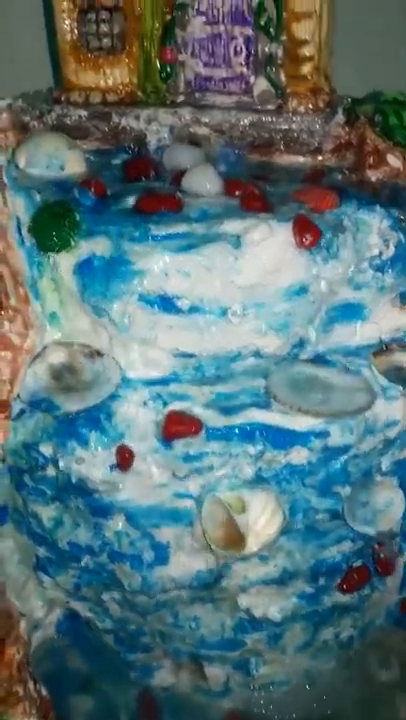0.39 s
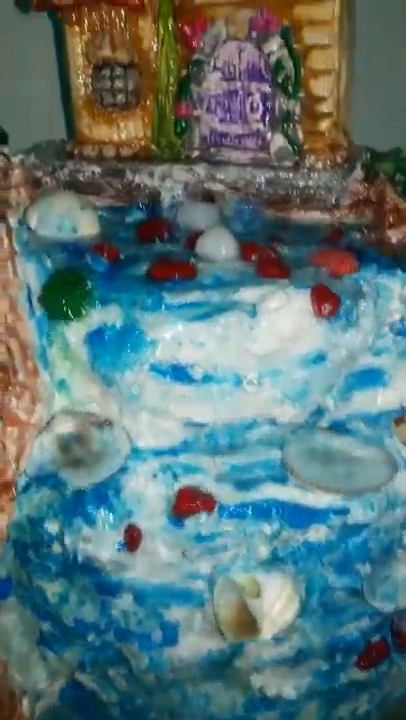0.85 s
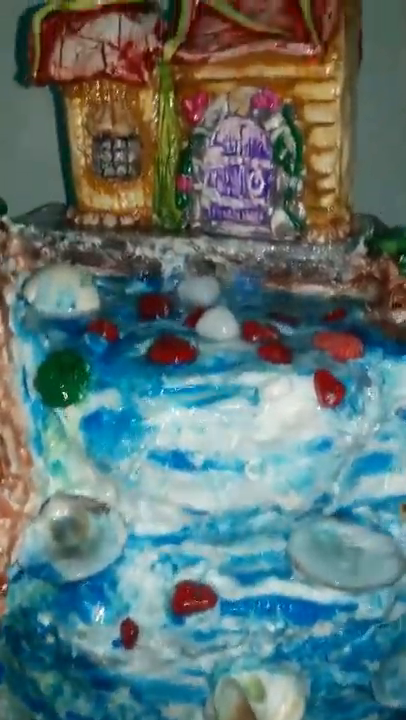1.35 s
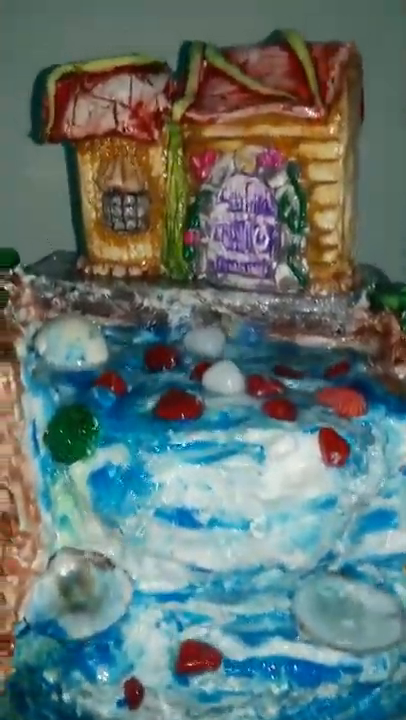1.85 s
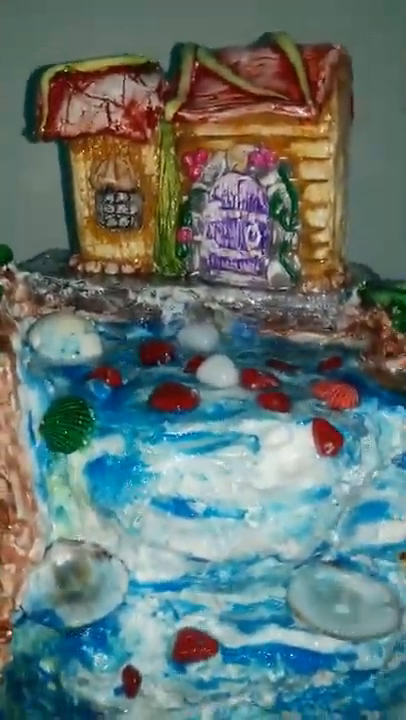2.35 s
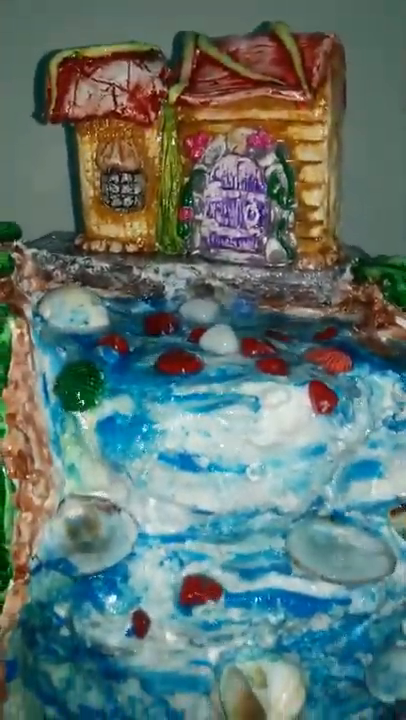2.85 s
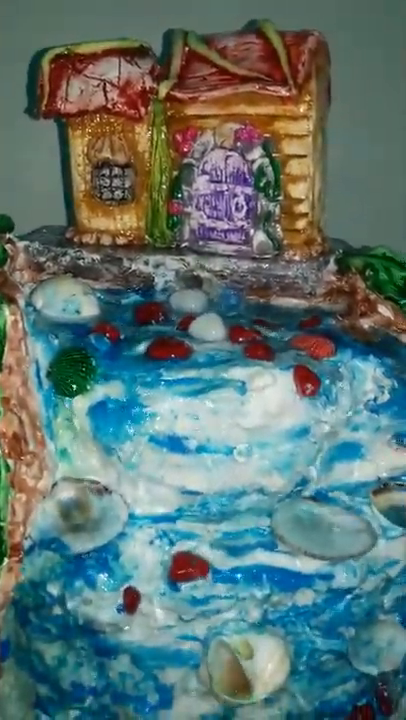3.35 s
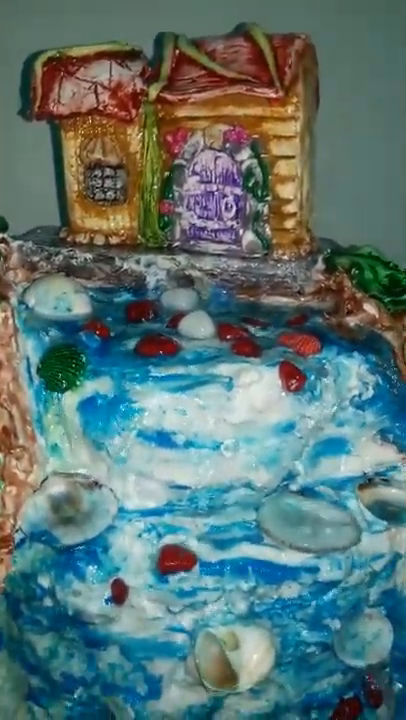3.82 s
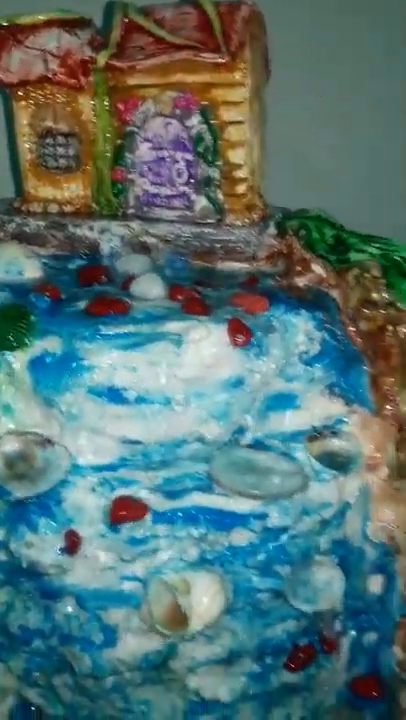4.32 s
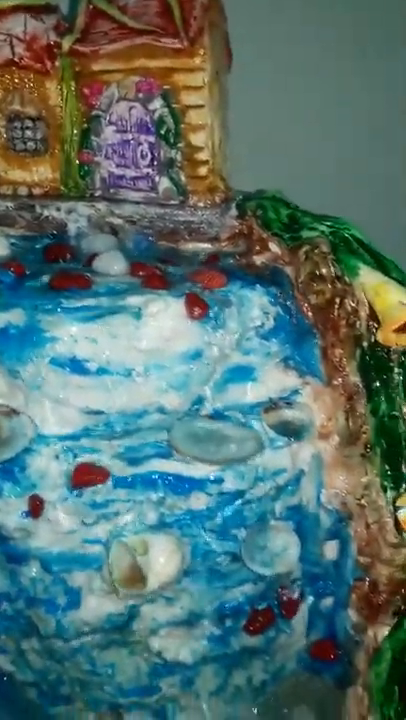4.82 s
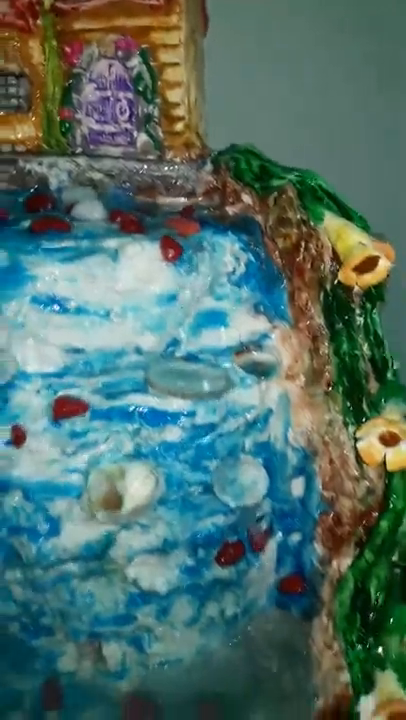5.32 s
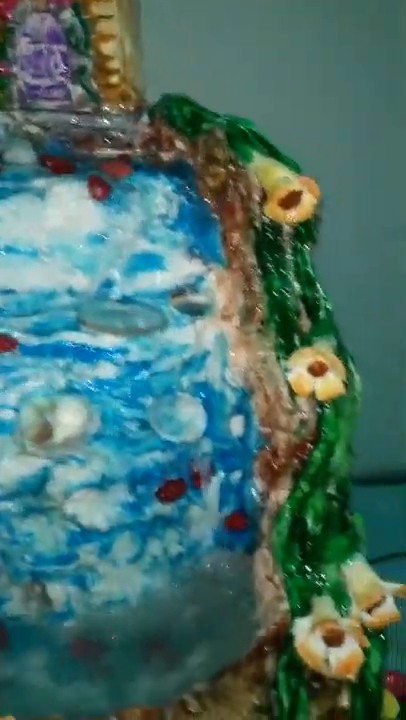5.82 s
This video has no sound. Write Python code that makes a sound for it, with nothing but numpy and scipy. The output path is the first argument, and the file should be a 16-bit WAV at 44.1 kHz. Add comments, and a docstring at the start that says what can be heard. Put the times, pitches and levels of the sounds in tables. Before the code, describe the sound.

Close microphone on trickling water in a small room. Tiny bubbles ring briefly with gliding pitches, sharp treble ticks mark splashes, and a faint patter runs throughout over a low, steady hum. Strong round plops fall mid-way, single clear drips follow near 3.8 and 4.8 seconds, and a gurgling flurry closes it.

```python
"""Small indoor fountain

Water drips and trickles into a basin close to a microphone, almost mono.
Trapped air bubbles ring as damped sines, glide in pitch and are cut off; splashes tick as treble noise snaps.
Finer droplets patter and spray at random; decaying noise tails form the small room's answer.
Shaped noise and faint tones give the pump's low hum, the far trickle and a thin whine that dies out."""
import sys
import numpy as np
from scipy import signal
from scipy.fft import rfft, irfft, next_fast_len
from scipy.io import wavfile
from scipy.ndimage import map_coordinates

SR = 44100
rng = np.random.default_rng(int(sys.argv[2]) if len(sys.argv) > 2 else 0)


def generate_wav(sig):
    """Save sig (samples, or channels by samples) to the path in sys.argv[1] as 16-bit PCM at SR."""
    pcm = np.round(np.clip(np.atleast_2d(sig).T, -1, 1) * 32767).astype(np.int16)
    wavfile.write(sys.argv[1], SR, pcm)


def gain_from_db(level_db):
    """Convert decibel levels to linear amplitude factors (20 dB per decade)."""
    decades = np.asarray(level_db, float) / 20
    return 10 ** decades


N = 261954  # samples


def unit(x):
    """Scale to rms 1."""
    return x / np.sqrt(np.mean(x ** 2) + 1e-20)


def along(points, hz):
    """Interpolate (Hz, value) points on a log-frequency axis."""
    point_hz, value = np.transpose(points)
    return np.interp(np.log(hz + 1), np.log(point_hz + 1), value)


def above(hz, edge_hz, steepness):
    """Gain of a smooth high-pass, one half at its edge."""
    return 1 / (1 + (edge_hz / (hz + 1)) ** steepness)


def filtered(x, response):
    """Multiply the spectrum of x by a response of frequency."""
    size = next_fast_len(N + 8192)
    spectrum = rfft(x, size) * response(np.fft.rfftfreq(size, 1 / SR))
    return irfft(spectrum, size)[..., :N]


def wobble(rate_hz):
    """Smooth random curve with rate_hz knots a second."""
    knots = rng.standard_normal(int(N * rate_hz / SR) + 4)
    return map_coordinates(knots, [np.arange(N) * rate_hz / SR])


def placed(start_s, grains):
    """Sum one grain per row at its start time."""
    at = np.round(start_s * SR).astype(int)[:, None] + np.arange(grains.shape[1])
    return np.bincount(at.ravel(), grains.ravel(), N + SR)[:N]


def ringing(start_s, level_db, pitch_hz, rise, t60_ms, life_ms, size):
    """Bubbles as damped sines whose pitch glides with age squared, choked off when they burst."""
    swell_cycles, burst_cycles = 0.32, 1.8
    t = np.arange(size) / SR
    level_db, hz, rise = level_db[:, None], pitch_hz[:, None], rise[:, None]
    t60, life = t60_ms[:, None] / 1000, life_ms[:, None] / 1000
    age = np.minimum(t / life, 1.3)
    cycles = hz * (t + rise * life * age ** 3 / 3)  # integral of hz * (1 + rise * age ** 2)
    swell = 1 - np.exp(-t * hz / swell_cycles)
    burst = np.clip((life - t) * hz / burst_cycles + .5, 0, 1)
    decay = gain_from_db(level_db - 60 * t / t60)
    return placed(start_s, decay * burst * swell * np.sin(2 * np.pi * cycles))


def drips():
    """Bubbles lose 60 dB in a set number of cycles unless they burst first; plinks are damped more heavily."""
    # bubbles that ring until they burst: start_s, level_db, pitch_hz, rise (share of pitch over life), life_ms
    bubbles = [(.028, -46.5, 3100, 0.41, 5.7), (.2831, -38, 3830, 0.28, 1.2),
               (0.6115, -34, 7800, -0.085, 1.5), (0.646, -33, 1070, -0.059, 5.8),
               (0.8761, -36, 7720, -0.063, 4), (.888, -36.5, 660, 0.15, 8.2),
               (0.638, -35, 1314, 0.78, 14.4), (1.136, -12.5, 3260, 0.1, 5.9), (1.682, -37, 3000, 0, 0.6),
               (2.039, -46, 4380, 0.09, 3.5), (2.1, -47, 2500, 0, 0.89), (1.157, -30, 5860, -0.067, 0.55),
               (1.1644, -16.5, 3130, -0.8, 1.05), (1.1657, -19, 2300, 0.015, 1.6),
               (1.411, -36.5, 5760, .07, 0.53), (1.5542, -22, 980, -0.63, 2.8), (1.555, -19, 608, 0.19, 29),
               (1.6397, -34.5, 6400, .14, 0.56), (1.697, -21, 3340, 0.012, 4.4),
               (1.7215, -11.5, 3076, -0.22, 3.65), (1.7494, -33.5, 2016, -0.086, 2.7),
               (1.758, -20.5, 1204, -0.16, 3.3), (1.76, -33.5, 1050, 0.22, 10),
               (1.8576, -33.5, 2970, 0.0019, 3.2), (2.0184, -16, 900, -0.55, 2.6),
               (2.0193, -19, 513, -0.12, 18.6), (2.0394, -28.5, 496, 0.34, 105),
               (2.165, -34, 897, 0.12, 5.7), (2.1652, -28, 2780, 0.72, 6.8),
               (2.4002, -33.5, 7480, 0.44, 2.7), (2.4619, -30, 3260, -0.12, 1.7),
               (2.5065, -26.5, 3370, -0.14, 0.8), (2.5066, -9.5, 762, 0.56, 8.3),
               (2.5297, -27.5, 2150, 0.16, 4.1), (2.5359, -27, 708, 0.72, 34), (2.5204, -43, 2500, .3, 3.4),
               (2.5366, -29, 4273, -.2, 0.88), (2.617, -39.5, 7197, 0.031, 0.91),
               (2.6849, -29.5, 2050, -0.037, 2.9), (2.7158, -28.5, 2940, -.23, 0.66),
               (2.744, -20, 1092, 0.14, 12), (2.752, -41, 1400, 0.62, 13), (2.7693, -27, 1920, -.15, 2),
               (2.7694, -24, 3390, 0.076, 1.4), (2.768, -37, 923, 0.55, 25), (2.7768, -31, 6564, 0.12, .71),
               (2.7834, -34, 6613, .06, 0.55), (2.899, -35, 860, -.21, 10), (3.044, -35, 6480, 0.1, 3.2),
               (3.131, -34, 6070, 0.42, 2), (3.2478, -30, 3610, -0.36, 1.3),
               (3.3046, -19.5, 982, -0.21, 5.4), (3.3086, -31, 883, -0.18, 10),
               (3.351, -36, 6518, 0.12, 0.63), (3.3506, -35, 3960, 0.13, 4.9), (3.3569, -25, 3530, 0, 1.6),
               (3.3783, -37, 1054, 0.038, 8), (3.4442, -25, 2850, .2, 5.3), (3.449, -34, 3980, 0.11, 3),
               (3.537, -46, 4270, 0, 7.4), (3.551, -45, 3500, 0, 5), (3.329, -50, 4280, 0, 4),
               (3.458, -37, 5750, 0.43, .87), (3.5994, -30.5, 6670, 0.43, 1.2),
               (3.7218, -35, 6640, 0.053, .43), (3.7557, -13.5, 3000, -0.11, 0.72),
               (3.8724, -33, 7100, 0.32, .67), (3.8819, -35, 3920, .16, 1.1),
               (4.074, -34.5, 990, -0.31, 5.8), (4.0968, -29.5, 1970, -0.11, 0.63),
               (4.1321, -37.5, 4260, -0.076, 1.3), (4.248, -27.5, 4740, 0.22, 0.36),
               (4.4529, -34.5, 796, -0.27, 15), (4.5782, -33.5, 3300, .19, 3),
               (4.8254, -36, 1560, -0.021, 45), (5.3625, -40, 1300, 0.1, 14), (5.652, -46.5, 3120, -.08, 8),
               (5.766, -38, 850, .1, 8.9), (5.0684, -34, 5700, .18, 3), (5.3191, -35.5, 5400, 0.5, 4.1),
               (5.3387, -17.5, 858, -0.12, 7.1), (5.3438, -36, 7100, 0.069, 2),
               (5.3542, -32.5, 3470, -0.086, 7.2), (5.3583, -21, 735, 0.42, 26),
               (5.3865, -31, 1244, 0.76, 5.8), (5.3904, -29, 5620, -0.027, 1.2),
               (5.3903, -21.5, 1283, 0.27, 7.25), (5.3978, -32.5, 1860, -0.089, 7.2),
               (5.4084, -23, 1199, -0.34, 2.1), (5.578, -35, 6900, -.04, 1.1),
               (5.5834, -26.5, 800, .2, 9.4), (5.588, -45, 3800, 0.15, 2.7), (5.596, -30, 1285, 0.098, 10),
               (5.609, -29, 686, 0.39, 22), (5.6234, -29, 590, -.12, 18), (5.6652, -23.5, 712, .74, 9.5),
               (5.7488, -31.5, 1940, 0.12, 7.4), (5.749, -30, 1430, -.01, 5.4),
               (5.831, -18.5, 885, -0.055, 12), (5.831, -20.5, 1680, 0.27, 6.6),
               (5.853, -28.5, 555, 0.43, 47), (5.878, -23.5, 726, 0.68, 5.9), (5.88, -31, 1730, -.05, 3.9),
               (5.891, -26, 568, 0.19, 24), (5.9244, -31.5, 4300, -0.14, 4.3),
               (5.9383, -27.5, 3380, -.05, 2.5)]
    # heavily damped plinks: start_s, level_db, pitch_hz, rise (share of pitch over life), t60_ms
    plinks = [(.005, -42.5, 3400, 0.39, 12), (.062, -47, 3940, 0, 17), (.083, -48.5, 6260, 0, 7),
              (0.1682, -42, 2960, 1.2, 18), (.229, -43, 2040, -0.17, 14), (.302, -47, 2500, 0.11, 28),
              (.588, -38, 2170, -0.2, 4.8), (.762, -42, 3230, .1, 8.6), (0.814, -47, 4240, 0, 8),
              (1.034, -39, 4360, -0.36, 2.9), (1.6694, -41, 2130, .17, 20), (3.607, -38.5, 3200, 0.021, 13),
              (4.2861, -38, 1990, -0.2, 19), (4.6649, -38, 6340, -0.5, 7.9), (4.779, -30.5, 1460, -0.65, 8),
              (4.7908, -39, 6091, -0.17, 6.3), (5.462, -38.5, 6940, -.1, 12), (5.6322, -35, 1957, 0, 20),
              (5.739, -41, 2800, 0.42, 12), (5.8539, -37.5, 4840, 0.85, 12), (5.864, -39, 6814, 0, 11),
              (5.8914, -36.5, 5600, 0.43, 12), (5.9277, -43, 1910, .3, 30), (0.4948, -31, 4230, 1.7, 11.6),
              (0.6098, -15.5, 968, 0.13, 38), (0.6367, -26.5, 1350, -0.017, 23),
              (0.6367, -17.5, 5400, 0.67, 1.85), (0.913, -21, 1860, -0.63, 2.5),
              (0.9456, -28.5, 4400, .06, 8.1), (0.9903, -36.5, 7570, -0.052, 11),
              (1.1358, -29.5, 6200, .33, 4), (1.1646, -26, 6825, -.3, 0.93), (1.1685, -25.5, 2100, 0.3, 23),
              (1.3212, -40, 1790, -.25, 8.9), (1.3222, -17, 4780, -0.54, 4.9),
              (1.3297, -31, 1500, -0.33, 9.1), (1.432, -22.5, 2770, -0.4, 11.6),
              (1.5009, -30.5, 2910, -0.14, 18), (1.5546, -29, 3000, 1.1, 3.1),
              (1.7253, -21, 2750, -0.071, 16), (1.7655, -29, 2608, .42, 4.5),
              (1.9329, -27.5, 3180, .08, 2.7), (2.0187, -16, 2260, 0.15, 1.94), (2.02, -26, 4950, 1.6, 1.4),
              (2.1762, -20.5, 3630, .4, 1.8), (2.1759, -19, 1930, -0.9, 12.3),
              (2.1757, -33, 6480, 0.22, 6.1), (2.229, -30.5, 3330, -.01, 18),
              (2.2434, -32.5, 7680, 0.38, 9.1), (2.291, -36, 1960, 0.25, 28), (2.321, -21, 3200, -.1, 1.4),
              (2.463, -2.5, 993, -0.1, 30), (2.734, -9, 946, 0.64, 48), (2.649, -40.5, 3800, .2, 7.2),
              (2.7255, -43, 2600, -.1, 6), (2.5104, -29.5, 1630, 1.5, 17), (2.535, -36.5, 6570, 0.043, 5.8),
              (2.63, -36, 1200, -.03, 10), (2.7336, -31, 2020, 0.12, 8.4), (2.7684, -21.5, 6340, 0.35, 5.3),
              (2.784, -33, 2091, -0.25, 6.5), (2.9503, -20, 5100, -0.066, 2),
              (3.301, -35.5, 3320, 0.64, 11), (3.415, -26, 1380, 0.32, 10), (3.4546, -23, 1310, 0.23, 17),
              (3.555, -38, 4500, -0.0035, 9.7), (3.645, -31, 2400, -0.73, 8.8), (3.659, -34, 4120, .02, 13),
              (3.723, -38.5, 4530, .09, 7.1), (3.7573, -11, 2104, 0.35, 9.5), (3.992, -24, 641, -.12, 88),
              (4.1145, -38, 4400, 1.2, 8.5), (4.63, -28.5, 6340, 0.88, 1.4),
              (4.674, -31.5, 2100, -0.24, 15), (4.8156, -12, 1593, -0.023, 17),
              (4.8167, -66, 3120, .54, 4.2), (5.3282, -33.5, 5530, 0.27, 8), (5.3375, -30, 1770, 0.52, 7.7),
              (5.3444, -21, 3170, -0.61, 4.3), (5.358, -28.5, 1386, -.05, 23),
              (5.387, -27.5, 3273, -0.17, 6.4), (5.3993, -37, 6870, 0.65, 13),
              (5.4081, -29.5, 3273, -.33, 7.1), (5.529, -38.5, 4400, -.02, 11),
              (5.5646, -19.5, 3260, -0.37, 3.9), (5.575, -34.5, 2030, -0.65, 30),
              (5.582, -30.5, 5997, -0.16, 7.9), (5.6003, -19, 736, 0.46, 17), (5.6992, -35, 3660, .2, 11),
              (5.749, -34, 910, -0.61, 45), (5.7623, -35, 3930, .13, 11), (5.8315, -27, 3200, .65, 4.6),
              (5.8322, -23.5, 6600, 0.35, 2.2), (5.8719, -36.5, 2900, -0.55, 23)]
    t60_cycles = 104
    plink_life = 0.65  # share of t60
    start_s, level_db, hz, rise, life_ms = np.transpose(bubbles)
    bursting = ringing(start_s, level_db, hz, rise, 1000 * t60_cycles / hz, life_ms, size=4800)
    start_s, level_db, hz, rise, t60_ms = np.transpose(plinks)
    damped = ringing(start_s, level_db, hz, rise, t60_ms, plink_life * t60_ms, size=2400)
    return bursting + damped


def blips(patter_db):
    """Middle-sized bubbles at random, stronger where the patter is."""
    when, size, pitch, long = rng.random((45, 4)).T
    hz = 1000 * (4500 / 1000) ** pitch
    level_db = patter_db[(when * (N - 1)).astype(int)] + 7 + 8 * size
    life_ms = 1000 * (8 + 18 * long ** 2) / hz
    return ringing(when * N / SR, level_db, hz, 0.22 * long - .05, 4 * life_ms, life_ms, size=1400)


def ticks():
    """Splash ticks as millisecond treble noise snaps, each with its own tilt; faint ones fall at random."""
    # the clearest ticks: start_s, top_octave_db, treble_db
    clear_ticks = [(0.0887, -45, -62), (0.2414, -53, -77), (0.4944, -56, -45.5), (0.611, -55, -46),
                   (0.6348, -45, -37.5), (0.7153, -47, -65), (0.876, -47, -44.5), (0.9462, -57, -47),
                   (0.9896, -52, -45.5), (1.1356, -45, -53), (1.1643, -36, -46.5), (1.3209, -46, -41.5),
                   (1.3514, -39, -59), (1.3743, -33, -62), (1.4097, -50, -53), (1.4232, -36, -63),
                   (1.4995, -54, -64), (1.521, -58, -50), (1.669, -51, -50), (1.7205, -56, -52),
                   (1.7214, -39, -60), (1.8891, -43, -74), (1.973, -50, -51), (2.0178, -47, -51),
                   (2.1345, -47, -61), (2.146, -38, -72), (2.2427, -44, -53), (2.3984, -54, -51),
                   (2.4625, -50, -49.5), (2.5302, -44, -47), (2.616, -46, -54), (2.7676, -47, -65),
                   (2.8963, -42, -69), (2.9496, -53, -44.5), (3.0435, -58, -53), (3.1284, -49, -51),
                   (3.2121, -45, -64), (3.378, -46, -54), (3.415, -42, -57), (3.4406, -48, -49),
                   (3.5982, -46, -51), (3.626, -61, -41), (3.7226, -47, -50), (3.7386, -41, -41),
                   (3.7524, -45, -39), (3.7758, -43, -53), (3.8716, -51, -50), (3.937, -32, -48.5),
                   (3.9737, -43, -47), (4.0968, -54, -40.5), (4.1829, -49, -68), (4.1953, -38, -62),
                   (4.2204, -51, -43.5), (4.2466, -46, -52), (4.328, -49, -42), (4.372, -56, -43.5),
                   (4.4614, -39, -62), (4.5296, -47, -58), (4.6302, -65, -38), (4.6828, -56, -51),
                   (4.771, -72, -52), (5.3273, -57, -66), (5.3273, -54, -48), (5.3442, -45, -43.5),
                   (5.3865, -51, -50), (5.462, -46, -55), (5.5363, -56, -59), (5.5742, -70, -52),
                   (5.5754, -48, -39.5), (5.6644, -35, -48), (5.692, -44, -48), (5.7382, -49, -41.5),
                   (5.8147, -50, -63), (5.8317, -19.5, -39), (5.8724, -36, -39.5)]
    faint_top_db, faint_treble_db, faint_spread_db = -55, -62, 3
    snap_db, snap_t60_s = 14.5, 0.0086
    when_s = rng.random(35) * N / SR
    spread_db = faint_spread_db * rng.standard_normal((35, 2))
    faint = np.column_stack([when_s, spread_db + [faint_top_db, faint_treble_db]])
    start_s, top_db, treble_db = np.vstack([faint, clear_ticks]).T
    t = np.arange(400) / SR
    snap = gain_from_db(snap_db - 60 * t / snap_t60_s) * rng.standard_normal((len(start_s), len(t)))
    treble = placed(start_s, gain_from_db(treble_db)[:, None] * snap)
    treble = filtered(treble, lambda hz: above(hz, 7420, 16) - above(hz, 16360, 16))
    top = placed(start_s, gain_from_db(top_db)[:, None] * snap)
    top = filtered(top, lambda hz: above(hz, 12870, 16))
    return treble + top


def patter(patter_db):
    """Many tiny bubbles in loose clumps: mostly faint and short, a few louder or longer."""
    when, size, long, pitch, clump = rng.random((5, 3000))
    when = np.clip(np.round(when * 260) / 260 + .003 * clump, 0, 1)
    hz = 800 * (7000 / 800) ** pitch
    strength_db = np.minimum(-3.5 * np.log(size + 1e-3), 9)
    level_db = patter_db[(when * (N - 1)).astype(int)] + 5 - 7 * pitch + strength_db
    life_ms = np.minimum(1000 * (3 + 16 * long ** 3) / hz, 15)
    return ringing(when * N / SR, level_db, hz, 0.42 * long, 3.1 * life_ms, life_ms, size=700)


def spray():
    """The finest droplets: faint, very high bubbles that burst within a few cycles."""
    when, size, pitch = rng.random((3, 1100))
    hz = 8800 * (16000 / 8800) ** pitch
    level_db = -60 + 3 * pitch + np.minimum(-4 * np.log(size + 1e-3), 12)
    life_ms = 1000 * 9 / hz
    return ringing(when * N / SR, level_db, hz, 0.32 * size, 4 * life_ms, life_ms, size=128)


def room(x):
    """Diffuse answer of basin and walls: a new decaying noise tail for every quarter second."""
    # decay of the room: frequency_hz, t60_s
    room_t60 = [(400, 0.62), (1000, 0.34), (1600, 0.38), (3000, 0.24), (4500, 0.18), (7000, 0.32),
                (14000, 0.14)]
    delay, step = 130, SR // 4  # samples
    out = np.zeros(N + SR)
    for at in range(0, N, step):
        hz, t, z = signal.stft(rng.standard_normal(SR // 2), SR, nperseg=256)
        decay = gain_from_db(-60 * t / along(room_t60, hz)[:, None])
        tail = signal.istft(z * decay, SR, nperseg=256)[1]
        wet = signal.fftconvolve(x[at:at + step], tail / np.linalg.norm(tail))
        out[at + delay:][:len(wet)] += wet
    return out[:N]


def background(bed_db, patter_db):
    """Low room and pump noise, a patchy far trickle and faint hum lines."""
    # spectrum shape of pump, trickle and room: frequency_hz, relative_density_db
    bed_spectrum = [(15, -45), (25, -43), (43, -8.5), (109, 3), (253, 0.5), (590, -7), (887, -6),
                    (1660, -17.5), (3370, -16.5), (4940, -26.5), (6900, -19.5), (7500, -27), (8060, -42),
                    (9000, -32), (12500, -31.5), (15400, -30), (16300, -55)]
    # pump lines: frequency_hz, mean_level_db (rms)
    hum_lines = [(200, -107), (387, -67.5)]
    # rise of the treble hiss: time_s, gain_db
    hiss_rise = [(2.4, 0), (3.6, 2.5), (5.9, 2)]
    t = np.arange(N) / SR
    noise = unit(filtered(rng.standard_normal(N), lambda hz: gain_from_db(along(bed_spectrum, hz))))
    low = filtered(noise, lambda hz: 1 / (1 + (hz / 550) ** 4))
    patchy_db = .5 * (patter_db - patter_db.mean()) - 2.0 + 2.0 * wobble(24.94)
    trickle = (noise - low) * gain_from_db(patchy_db)
    treble = filtered(trickle, lambda hz: above(hz, 7900, 20))
    trickle += (gain_from_db(np.interp(t, *np.transpose(hiss_rise))) - 1) * treble
    hum = np.zeros(N)
    for hz, level_db in hum_lines:
        level = gain_from_db(level_db + 2 * wobble(6)) * np.sqrt(2)
        hum += level * np.sin(2 * np.pi * hz * t + .8 * wobble(5))
    return gain_from_db(bed_db) * low + gain_from_db(bed_db.mean()) * trickle + hum


def whine():
    """Thin, slightly unsteady high tone that dies out."""
    pitch_hz, level_db, silent_s = 8520, -85, 3.2
    t = np.arange(N) / SR
    fade = np.clip(silent_s - t, 0, 1)
    level = gain_from_db(level_db + 2.3 * wobble(9.9))
    return level * fade * np.sin(2 * np.pi * pitch_hz * t + 1.7 * wobble(36))


def scene():
    """Water and its room over the background in both channels, plus a very faint phase-randomised left-right noise."""
    # slow motion: time_s, background_db, patter_db
    flow = [(0.0, -49, -55), (0.43, -50.5, -63), (0.83, -50.5, -57), (0.97, -50, -59), (1.7, -50, -59.5),
            (2.23, -50.5, -55), (2.36, -49.5, -56), (3.01, -50, -56.5), (3.69, -49.5, -54),
            (5.23, -49, -60), (5.79, -49, -47.5), (5.94, -45, -46.5)]
    # microphone response to the water: frequency_hz, gain_db
    mic_response = [(100, -16), (250, -14), (450, -7.5), (7200, 10.5), (8000, -5), (8800, -0.5),
                    (15500, -6), (16500, -28)]
    # level of the left-right noise by frequency: frequency_hz, gain_db
    noise_response = [(60, -36), (400, -22.5), (1300, -10.5), (4400, -16), (15000, -14.5)]
    time_s, *levels_db = np.transpose(flow)
    bed_db, patter_db = (np.interp(np.arange(N) / SR, time_s, db) for db in levels_db)
    water = drips() + blips(patter_db) + ticks() + spray() + patter(patter_db)
    # scatter off the rippling surface smears each ring on its way to the walls
    rippled = water * (.85 + .55 * wobble(1200))
    water = filtered(water + gain_from_db(-19.0) * room(rippled), lambda hz: gain_from_db(along(mic_response, hz)))
    bed = background(bed_db, patter_db) + whine()
    hz, t, z = signal.stft(bed + gain_from_db(-16) * water, SR, nperseg=512)
    random_phase = np.exp(2j * np.pi * rng.random(z.shape))
    randomised = z * gain_from_db(along(noise_response, hz))[:, None] * random_phase
    left_right_noise = signal.istft(randomised, SR, nperseg=512)[1][:N]
    return water + bed + np.array([left_right_noise, -left_right_noise])


def roll_off(x):
    """The treble ends steeply here."""
    return signal.sosfilt(signal.butter(12, 16980, fs=SR, output="sos"), x)


def record(dry):
    """Deliver the finished mix."""
    return roll_off(dry)


dry = scene()
out = record(dry)
generate_wav(out)
```